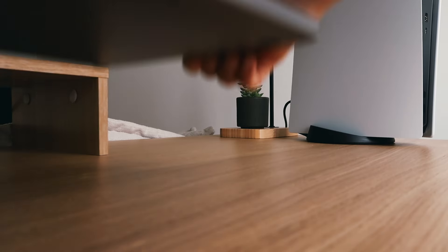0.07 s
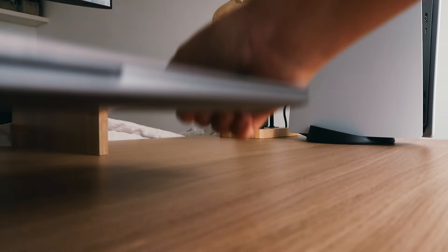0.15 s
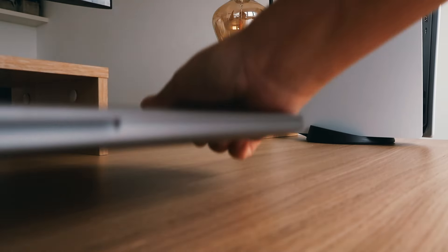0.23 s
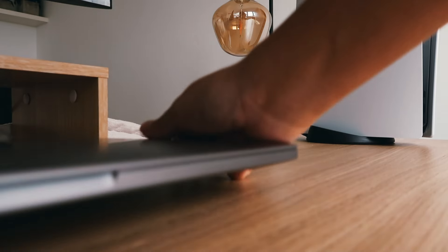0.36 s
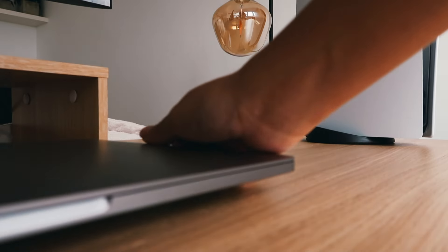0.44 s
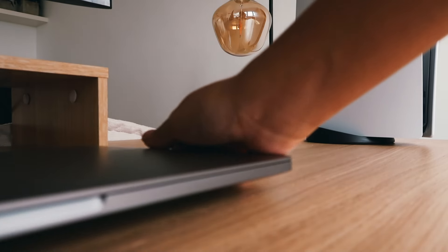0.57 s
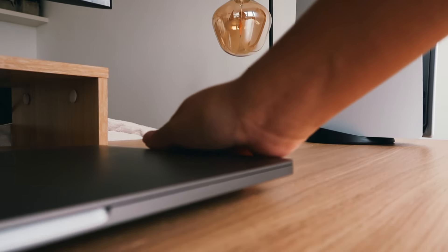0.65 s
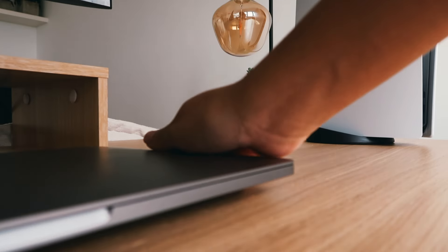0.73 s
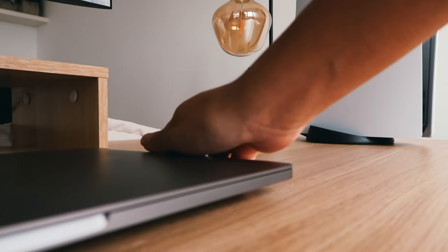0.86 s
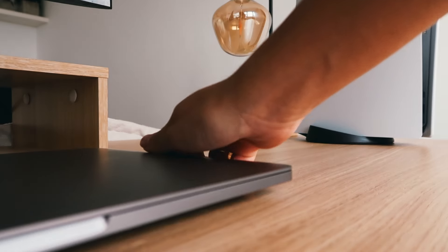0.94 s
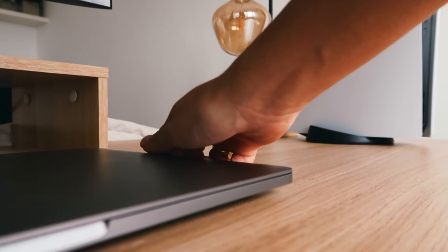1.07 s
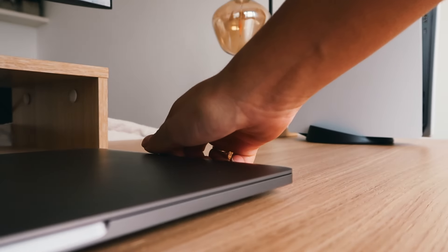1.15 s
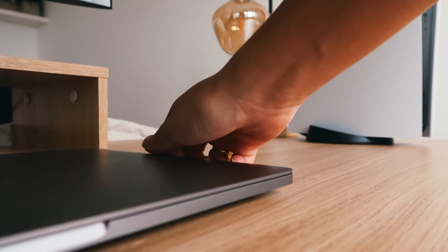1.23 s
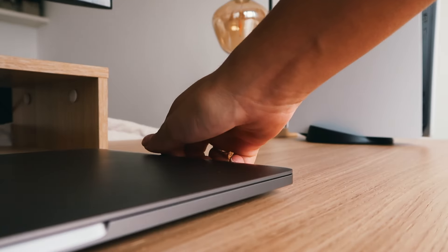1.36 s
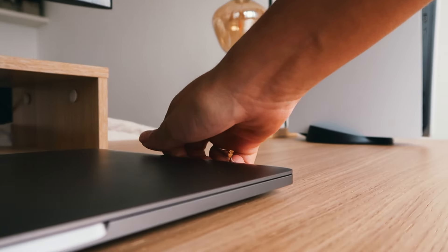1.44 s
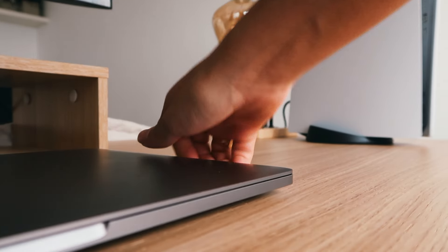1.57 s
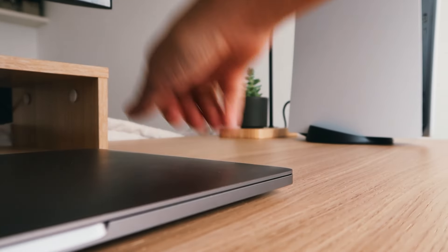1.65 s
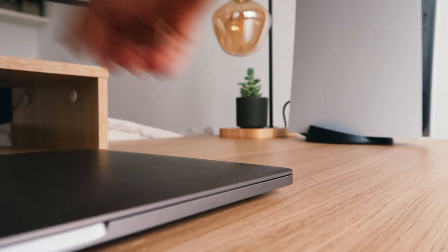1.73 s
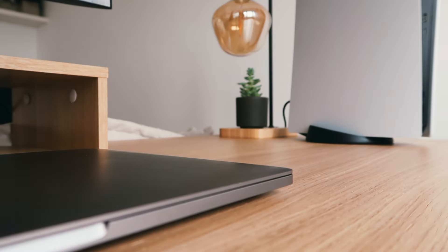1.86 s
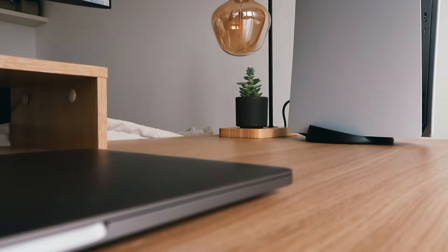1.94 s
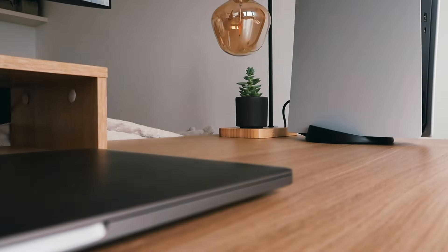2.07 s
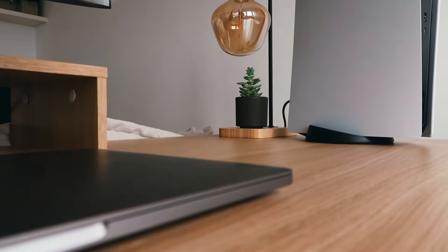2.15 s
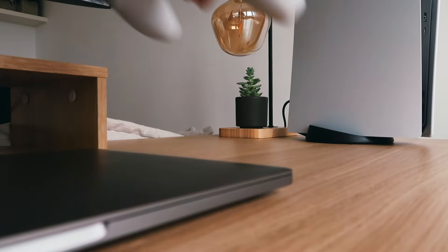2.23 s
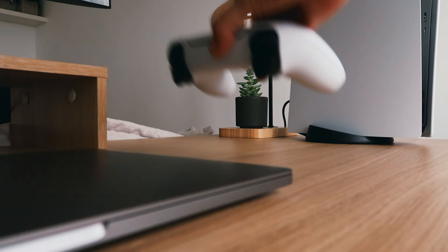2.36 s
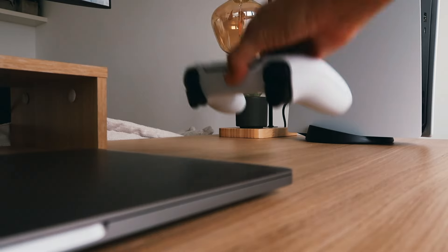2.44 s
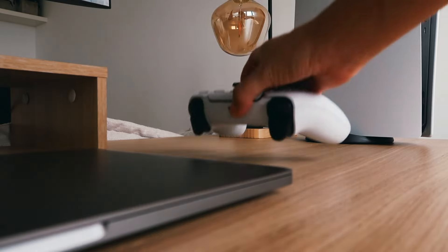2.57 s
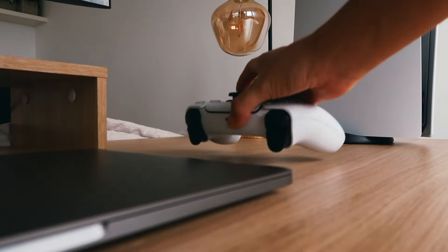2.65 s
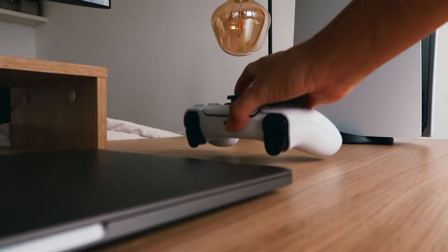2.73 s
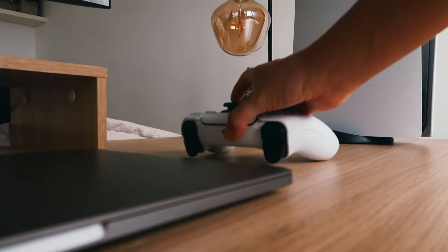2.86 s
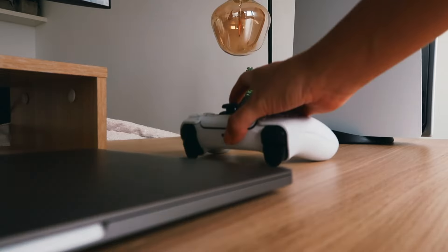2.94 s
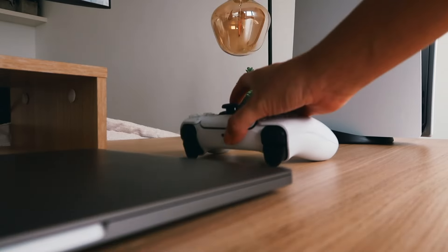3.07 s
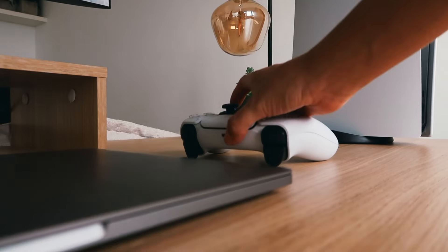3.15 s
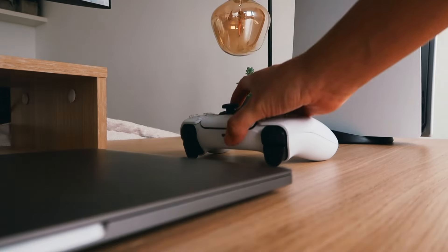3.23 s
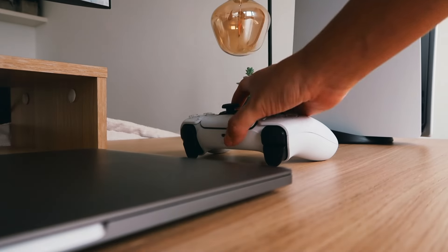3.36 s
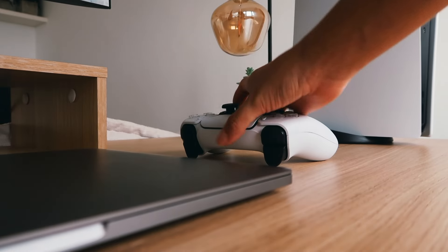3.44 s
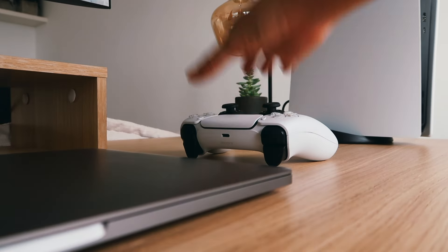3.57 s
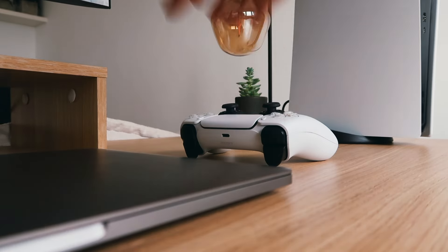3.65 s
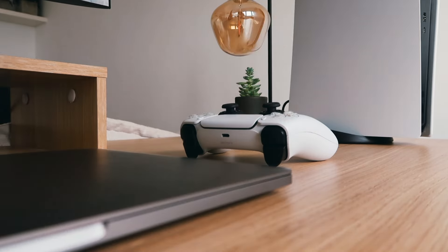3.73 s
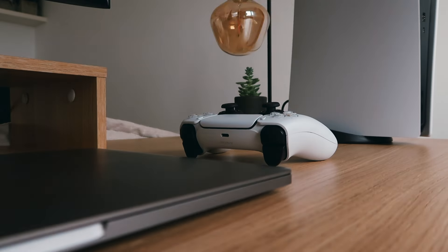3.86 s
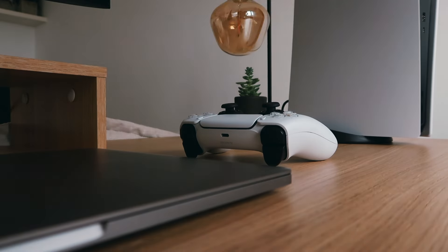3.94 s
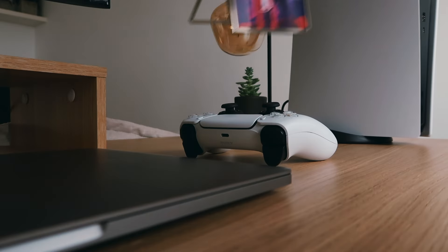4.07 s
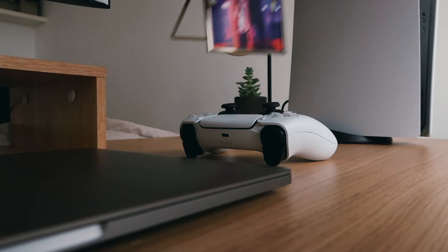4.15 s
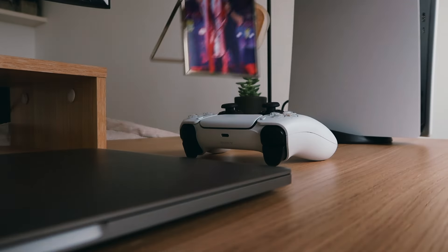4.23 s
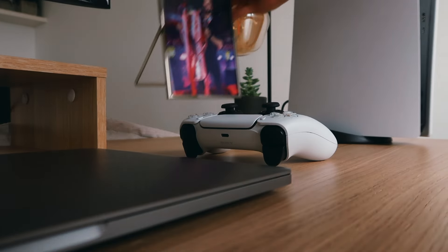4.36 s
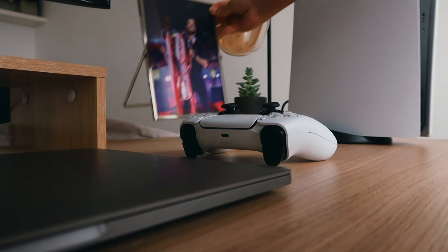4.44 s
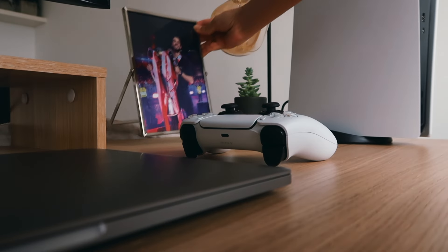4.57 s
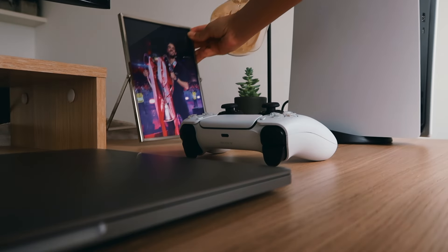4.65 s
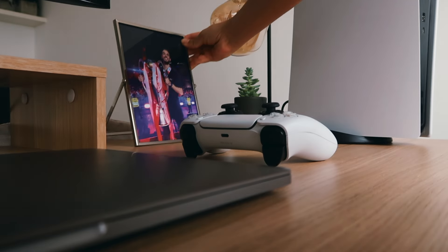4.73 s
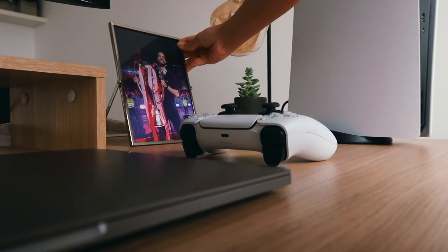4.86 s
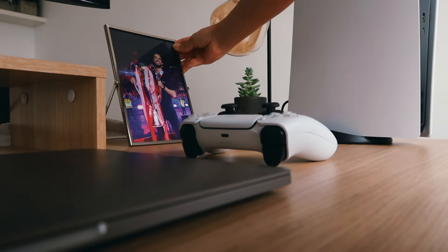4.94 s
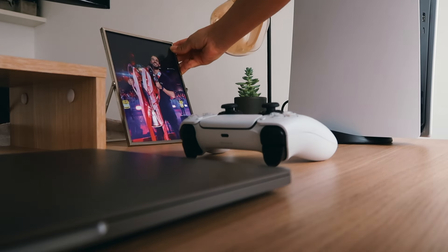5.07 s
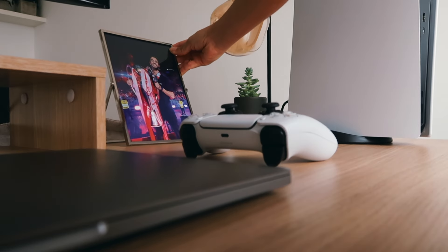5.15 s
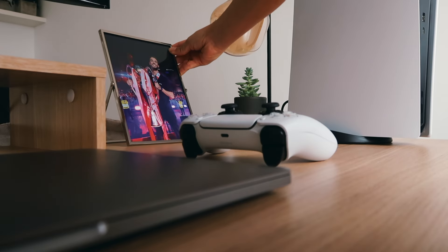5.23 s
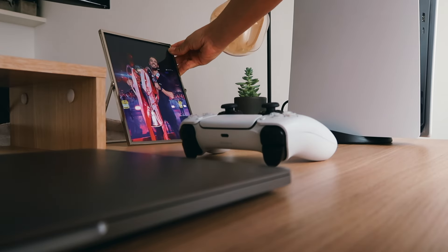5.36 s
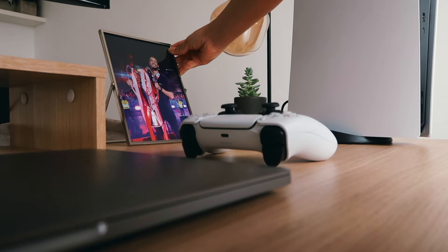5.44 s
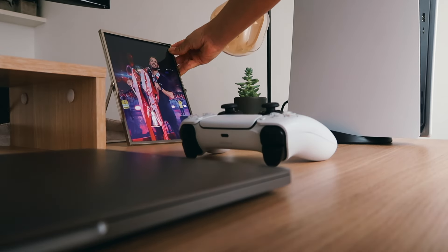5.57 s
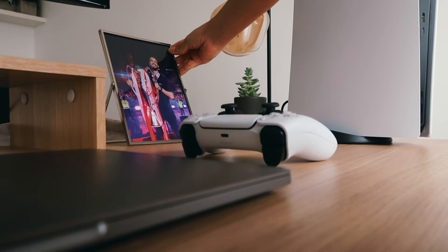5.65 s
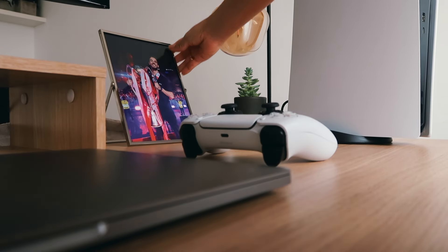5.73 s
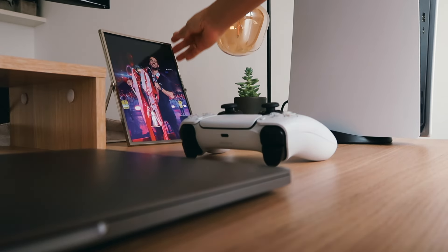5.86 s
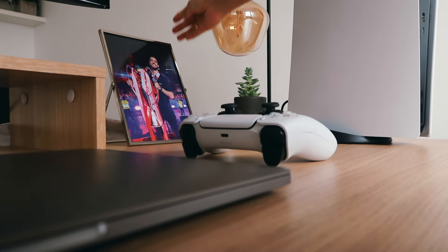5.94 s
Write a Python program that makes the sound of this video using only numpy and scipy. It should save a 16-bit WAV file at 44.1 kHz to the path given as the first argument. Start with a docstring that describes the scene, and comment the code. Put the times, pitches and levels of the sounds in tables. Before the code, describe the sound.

A laptop, a game controller and a standing picture frame are set down in turn on a wooden desk, knocking sharply in a quiet room.

```python
"""Fingers brush softly over a quiet room tone, then a laptop clunks down on a wooden desk in a small room.
A game controller follows with rattle and small ticks, then a standing picture frame that slides on its stand.
Each lands on one edge and then on its other feet; every contact sends out a pulse and rings object and desk.
Damped modes make the knocks, trains of tiny slips the rubs, shaped noise the air and a sine the whine."""
import sys
import numpy as np
from scipy import signal
from scipy.fft import rfft, irfft
from scipy.io import wavfile

SR = 44100
rng = np.random.default_rng(int(sys.argv[2]) if len(sys.argv) > 2 else 0)


def put_to_file(sound):
    """Save the sound as 16-bit audio at rate SR, in the file named by the first command-line argument."""
    columns = np.atleast_2d(sound).T  # one column per channel
    safe = np.clip(columns, -1, 1)
    whole_steps = np.round(safe * 32767)
    wavfile.write(sys.argv[1], SR, whole_steps.astype(np.int16))


N = 264600   # length in samples (6 s)
AGE = np.arange(SR) / SR   # seconds since a sound began
EDGES = 20 * 2 ** np.arange(0, 10.1, .5)   # half-octave band edges, Hz
CENTRES = np.sqrt(EDGES[1:] * EDGES[:-1])
BANK = [signal.butter(2, band, "band", fs=SR, output="sos") for band in zip(EDGES, EDGES[1:])]

# Laptop contacts: start_s, level_db, place (0 landing edge to 1 far feet), free_db (how freely it rings),
# desk_db (desk-top ring), sway_db (whole desk), wet_db (sent to the room), top_hz (contact bandwidth)
LAPTOP_CONTACTS = [(.449, -31, 0.3, -4, 1.5, -13, -3, 308), (.6436, 1, 0.29, 0.5, -2.5, 2, -5.5, 5500),
                   (.7396, -11, 0.92, 4.5, 3, 12, 0.5, 3100), (1.0724, -5, 0.89, -6, -4.5, 8, -10, 1710),
                   (1.578, -26.5, 0.77, 0, -6, -4, -3, 380)]
# Laptop modes: pitch_hz, edge_db (struck on landing edge), feet_db (struck on far feet), t60_s
LAPTOP_MODES = [(197, -28.5, -24, 0.13), (297, -56, -37, 0.096), (380, -29, -27, 0.05),
                (467.7, -26.5, -34, 0.15), (637, -29, -34.5, 0.1), (767, -35, -39, 0.058),
                (930, -52, -44, 0.014), (1114, -24, -42, 0.023), (1285, -31, -29, 0.032),
                (1463, -39, -37, 0.076), (1580, -35, -33, 0.015), (1835, -33.5, -31.5, 0.037),
                (2770, -46, -45, 0.063), (3130, -32, -35, 0.021), (4300, -40, -41, 0.017),
                (5990, -32, -46, 0.018)]
# Laptop's crowd of quickly damped higher modes: pitch_hz, density_db (per Hz)
LAPTOP_CROWD = [(30, -20), (80, -5), (230, 18.5), (600, 6), (1000, 1), (1650, 1), (2200, -10.5),
                (5000, -19.5), (8000, -24.5), (14000, -8.5)]
# Hard laptop edge clicking on the desk: start_s, level_db
LAPTOP_CLICKS = [(.582, -22.5), (1.0724, -18.5), (1.557, -27)]


def laptop():
    """A broad plate lands with a short crack, a chassis ring and a strong answer from the desk."""
    landing = set_down(LAPTOP_CONTACTS, LAPTOP_MODES, LAPTOP_CROWD, modes_db=-1.5, pulse_db=-1.0,
                       crack_db=0.0, crack_t60=0.018, lag_s=0.00041, room_db=-3.5, boom_db=-10.5,
                       diffuse_db=2.5, order=3, lowest_hz=22)
    clicks = edge_clicks(LAPTOP_CLICKS, LAPTOP_MODES, LAPTOP_CROWD, modes_db=-10, low_hz=249,
                         high_hz=4000, crack_t60=0.012, room_db=-8.0)
    return landing + clicks


# Controller contacts: start_s, level_db, place (0 landing edge to 1 far feet), free_db (how freely it rings),
# desk_db (desk-top ring), sway_db (whole desk), wet_db (sent to the room), top_hz (contact bandwidth)
CONTROLLER_CONTACTS = [(2.8707, -1.5, 0.019, 1, -5.5, -24, -4, 5840),
                       (2.8757, -5, 0.19, -8, -16, -26, -9, 4500), (2.8975, -20, 0, 8, -14, -26, -9, 2600),
                       (2.918, -5, 0.99, 0, -1.5, -26, -5, 4300),
                       (2.9282, -10.5, 1, -0.5, 2, -27, -2, 1900),
                       (2.9455, -14.5, 0.45, -2, -2.5, -27, 5.5, 2100),
                       (2.9915, -13.5, 0.93, 2.5, 5, -15, 1.5, 1400),
                       (3.4868, -21.5, 0.6, -3, 4, -1, -1, 845)]
# Controller modes: pitch_hz, edge_db (struck on landing edge), feet_db (struck on far feet), t60_s
CONTROLLER_MODES = [(97, -29.5, -32.5, 0.18), (166, -37, -32, 0.22), (229, -26.5, -38, 0.13),
                    (394, -50, -25, 0.14), (539, -28.5, -45, 0.22), (630, -21.5, -40, 0.06),
                    (722, -25.5, -33, 0.053), (890, -31.5, -22.5, 0.034), (1414, -44, -52, 0.22),
                    (1565, -34.5, -24.5, 0.03), (1700, -44, -52, 0.043), (2540, -60, -41, 0.03),
                    (2880, -58, -60, 0.043), (3800, -46, -41, 0.028)]
# Controller's crowd of quickly damped higher modes: pitch_hz, density_db (per Hz)
CONTROLLER_CROWD = [(25, -36), (60, -6), (115, 16), (380, 12), (650, 10.5), (1000, -2), (1700, 1.5),
                    (2600, -7.5), (4000, -21), (8000, -29), (14000, -21)]
# Hard controller edge clicking on the desk: start_s, level_db
CONTROLLER_CLICKS = [(2.9178, -8), (2.9883, 0)]


def controller():
    """A plastic shell lands with a longer crack, hard edge clicks and loose parts that chatter."""
    landing = set_down(CONTROLLER_CONTACTS, CONTROLLER_MODES, CONTROLLER_CROWD, modes_db=-3.5, pulse_db=0.0,
                       crack_db=-2, crack_t60=0.03, lag_s=0.00079, room_db=-4.0, boom_db=-6.5,
                       diffuse_db=-2.5, order=2, lowest_hz=83)
    clicks = edge_clicks(CONTROLLER_CLICKS, CONTROLLER_MODES, CONTROLLER_CROWD, modes_db=-17, low_hz=1780,
                         high_hz=4270, crack_t60=0.02, room_db=-7.0)
    return landing + clicks + rattle(CONTROLLER_CONTACTS, CONTROLLER_CROWD, CONTROLLER_MODES)


def rattle(contacts, crowd, modes, clicks_per_s=710, t60_s=0.24, level_db=-13.5, shell_db=5.5, room_db=-7.5):
    """Each blow shakes loose buttons and triggers into a dying run of tiny clicks on the shell."""
    growth = 2.14   # dB of rattle per dB of blow: gentle touches barely shake the parts
    out, room = np.zeros((2, N)), room_response(0)
    shell = from_db(shell_db) * ring(struck_at(modes, 0))
    click = low_pass(high_pass(first_wave(crowd) + shell, 880), 3100, order=3)
    for start_s, blow_db, *_ in contacts:
        touches = (rng.random(SR) < clicks_per_s / SR) * rng.choice([-1, 1], SR)
        touches = touches * from_db(-60 * AGE / t60_s)
        sound = from_db(growth * blow_db + level_db) * signal.fftconvolve(touches, click)[:SR]
        add(out, start_s, at_ports(sound) + from_db(room_db) * echo(sound, room))
    return out


# Plastic ticks: start_s, level_db, button_db (share that rings the button), cut_hz
TICK_TIMES = [(3.4756, -18.5, 4, 4500), (3.4784, -16.5, 0, 3980), (3.8922, -26, -17, 13000)]
# Tick colour: pitch_hz, density_db (per Hz)
TICK_CROWD = [(100, 4), (1000, -12), (1750, -5), (2500, -23), (4000, -11), (8000, -36), (14000, -23)]
# A released button rings: pitch_hz, level_db, t60_s
BUTTON_MODES = [(1730, -40.5, 0.028), (3700, -41, 0.012)]


def ticks(room_db=-10.0):
    """Tiny clicks of plastic as the hand lets go and the controller rests: a short crack and a button ring."""
    out, room = np.zeros((2, N)), room_response(0)
    for start_s, level_db, button_db, cut_hz in TICK_TIMES:
        button = from_db(button_db) * ring(BUTTON_MODES)
        click = from_db(level_db) * low_pass(crack(TICK_CROWD, t60=0.013) + button, cut_hz)
        add(out, start_s, at_ports(click) + from_db(room_db) * echo(click, room))
    return out


# Frame contacts: start_s, level_db, place (0 landing edge to 1 far feet), free_db (how freely it rings),
# desk_db (desk-top ring), sway_db (whole desk), wet_db (sent to the room), top_hz (contact bandwidth)
FRAME_CONTACTS = [(4.7524, 1, 0.19, 0.0035, 1.5, -19, -3, 6860), (4.8417, 0.5, 1, 0, -5.5, -27, -2, 4700),
                  (5.1585, -4.5, 1, 0, -4, -23, -2, 2920), (5.249, -29, 0.67, 0, 10, -12, 2.5, 550),
                  (5.336, -20.5, 1, 0, -1, -18, -9.5, 690)]
# Frame modes: pitch_hz, edge_db (struck on landing edge), feet_db (struck on far feet), t60_s
FRAME_MODES = [(274, -11.5, -27, 0.03), (295, -29.5, -24, 0.14), (396.4, -20.5, -23, 0.092),
               (447, -20, -16.5, 0.056), (610, -42, -44, 0.069), (900, -47, -56, 0.065),
               (1200, -61, -31, 0.048), (1340, -22.5, -28.5, 0.056), (1520, -29, -27, 0.045),
               (1744, -36, -49, 0.054), (2194, -28.5, -35, 0.031), (2560, -26, -23.5, 0.018),
               (3110, -37, -38.5, 0.018), (3950, -41.5, -50, 0.022), (4350, -63, -41, 0.017),
               (5700, -42, -56, 0.029)]
# Frame's crowd of quickly damped higher modes: pitch_hz, density_db (per Hz)
FRAME_CROWD = [(30, -11), (70, 5.5), (300, 15), (700, -0.5), (1000, -4.5), (1500, -1.5), (2500, -8.5),
               (4000, -28), (8000, -36), (14000, -32)]
# Hard frame edge clicking on the desk: start_s, level_db
FRAME_CLICKS = [(5.1565, -7.5)]


def frame():
    """A frame lands with a soft pulse, a knock spread by bending waves and a full room answer."""
    landing = set_down(FRAME_CONTACTS, FRAME_MODES, FRAME_CROWD, modes_db=-7.5, pulse_db=-12.5,
                       crack_db=-1.0, crack_t60=0.024, lag_s=0.001595, room_db=-6.5, boom_db=-1.5,
                       diffuse_db=6.0, order=2, lowest_hz=35.6)
    clicks = edge_clicks(FRAME_CLICKS, FRAME_MODES, FRAME_CROWD, modes_db=-7, low_hz=2200,
                         high_hz=7440, crack_t60=0.01, room_db=-9.0)
    return landing + clicks


# Desk-top modes: pitch_hz, level_db, t60_s
DESK_MODES = [(122, -41.5, 0.59), (179.1, -35, 0.54), (197.3, -26, 0.089), (230, -55, 0.11),
              (280.3, -38, 0.11), (322, -34.5, 0.13)]
# Modes of the whole desk on its legs: pitch_hz, level_db, t60_s
SWAY_MODES = [(52, -50.5, 0.68), (68, -36.5, 0.3), (90.4, -45, 0.35), (110, -40.5, 0.34)]


def set_down(contacts, modes, crowd, modes_db, pulse_db, crack_db, crack_t60, lag_s, room_db, boom_db,
             diffuse_db, order, lowest_hz):
    """Every contact sends out a pulse and rings object and desk; where it touches decides which modes speak."""
    out, room = np.zeros((2, N)), room_response(0)
    pulse = from_db(pulse_db) * first_wave(crowd)
    for start_s, level_db, place, free_db, desk_db, sway_db, wet_db, top_hz in contacts:
        object_ring = from_db(modes_db + free_db) * ring(struck_at(modes, place))
        desk_ring = from_db(desk_db) * low_pass(ring(DESK_MODES, in_step=True), 870)
        # air slips round a small plate, so it radiates little bass
        body = high_pass(object_ring + desk_ring, 76)
        attack = high_pass(pulse + from_db(crack_db + free_db) * crack(crowd, crack_t60), lowest_hz)
        # the whole desk nods on its legs
        sway = from_db(sway_db) * high_pass(ring(SWAY_MODES), 35)
        direct = at_ports(dispersed(attack + body + sway, lag_s))
        # low modes keep their pitch in the room; high ones beam in all directions and blend to a smooth wash
        boom = from_db(boom_db) * echo(low_pass(body, 810), room)
        tail = boom + from_db(diffuse_db) * wash(crowd)
        # each contact has its own bandwidth: dull thuds lose more treble than bright knocks
        knock = low_pass(direct + from_db(room_db + wet_db) * tail, top_hz, order=order)
        add(out, start_s, from_db(level_db) * knock)
    return out


def edge_clicks(clicks, modes, crowd, modes_db, low_hz, high_hz, crack_t60, room_db):
    """An edge touches with no weight behind it: a crack and the high modes, without the bass."""
    out = np.zeros((2, N))
    for start_s, level_db in clicks:
        attack = from_db(-6.5) * first_wave(crowd) + crack(crowd, crack_t60)
        direct = at_ports(attack + from_db(modes_db) * ring(struck_at(modes, 1)))
        click = high_pass(direct + from_db(room_db) * wash(crowd), low_hz)
        add(out, start_s, from_db(level_db) * low_pass(click, high_hz))
    return out


# Frame slides: peak_s, swell_s, fade_s, level_db, cut_hz
SLIDE_STROKES = [(5.151, 0.026, 0.012, -45.5, 4300), (5.21, 0.082, 0.035, -49, 2200),
                 (5.348, 0.033, 0.019, -54, 820), (5.535, 0.019, 0.0089, -55.5, 1000)]
# Colour of one scraping slip: pitch_hz, level_db
SCRAPE_COLOUR = [(100, 4), (400, 12), (700, 3), (1400, 0), (2600, -7), (3400, -13), (4200, -13),
                 (6000, -24), (14000, -36)]


def frame_slides():
    """The frame slides a little on its stand: each slip gives a scrape and a dull ring of the frame."""
    frame_ring = from_db(-9.0) * low_pass(ring(struck_at(FRAME_MODES, 0.55)), 440)
    texture = frame_ring + first_wave(SCRAPE_COLOUR)
    return rub(SLIDE_STROKES, texture, slips_per_s=2200, grain_db=1.5, room_db=-8.5)


# Finger rubs: peak_s, swell_s, fade_s, level_db, cut_hz
FINGER_STROKES = [(.19, 0.014, 0.017, -64, 1780), (.25, 0.026, 0.034, -68, 1900),
                  (1.583, 0.032, 0.023, -59, 1800), (1.599, 0.011, 0.0074, -59.5, 14000),
                  (1.62, 0.006, 0.014, -63, 16000), (1.653, 0.0065, 0.0072, -71, 9100),
                  (2.025, 0.037, 0.02, -62, 680)]
# Colour of one slip of skin: pitch_hz, level_db
SKIN_COLOUR = [(100, -16), (400, 10), (900, 5.5), (1600, 11), (3000, 10.5), (5500, 3.5), (9000, -15),
               (13000, -7), (16000, -18)]


def finger_brushes():
    """Fingers brush off the lid: soft, unevenly grained trains of skin slips."""
    return rub(FINGER_STROKES, first_wave(SKIN_COLOUR), slips_per_s=1600, grain_db=4.0, room_db=-7.5)


def rub(strokes, texture, slips_per_s, grain_db, room_db):
    """Separate tiny slips of uneven strength, under a swelling stroke, drive the surface that is rubbed."""
    out, room = np.zeros((2, N)), room_response(0)
    lead_s = .125   # room for the swell before the peak
    for peak_s, swell_s, fade_s, level_db, cut_hz in strokes:
        unevenness = rms_one(low_pass(rng.standard_normal(SR), 100))
        sizes = rng.choice([-1, 1], SR) * from_db(grain_db * unevenness)
        slips = (rng.random(SR) < slips_per_s / SR) * sizes
        friction = rms_one(low_pass(signal.fftconvolve(slips, texture)[:SR], cut_hz))
        stroke = np.exp(-((AGE - lead_s) / np.where(AGE < lead_s, swell_s, fade_s)) ** 2)
        sound = from_db(level_db) * friction * stroke
        add(out, peak_s - lead_s, at_ports(sound) + from_db(room_db) * echo(sound, room))
    return out


# Air noise colour, mid: pitch_hz, level_db
AIR_MID = [(12, -43), (20, -22), (49, -0.5), (97, -2), (151, -10.5), (174, -3), (205, -9), (302, -5.5),
           (357, -4), (409, -15), (674, -16), (733, -17), (940, -16.5), (12700, -39.5), (15000, -121)]
# Air noise colour, side: pitch_hz, level_db
AIR_SIDE = [(12, -61), (20, -36), (155, 4.5), (398, 5), (525, -1.5), (1020, -4.5), (2220, -11), (4200, -11),
            (4950, -22), (12700, -27), (15000, -71)]


def room_tone(mid_db=-63, side_db=-65, whine_hz=13007, whine_db=-95):
    """Dull steady air noise and a thin electrical whine, a pure sine."""
    whine = from_db(whine_db) * np.sqrt(2) * np.sin(2 * np.pi * whine_hz * np.arange(N) / SR)
    air = np.array([from_db(mid_db) * steady(AIR_MID, N), from_db(side_db) * steady(AIR_SIDE, N)])
    return low_pass(air, 12000, order=10) + np.array([whine, 0.3 * whine])


# Room decay: pitch_hz, t60_s
ROOM_DECAY = [(60, 0.4), (160, 0.51), (420, 0.45), (1100, 0.39), (2900, 0.64), (8000, 0.47), (14000, .2)]
# Room colour: pitch_hz, level_db
ROOM_BALANCE = [(60, 10.5), (160, 5), (400, 6), (900, 1), (2500, 2), (6000, 8), (14000, -4.5)]
# Two close microphone ports hear the bass alike: pitch_hz, side_minus_mid_db
PORT_WIDTH = [(60, -62), (170, -51), (350, -18), (700, -19), (1400, -14.5), (2800, -8), (5500, -4),
              (11000, 6.5)]


def room_response(spectrum, build_s=0.0025, lumpy_db=4.5, mixing_s=0.076):
    """Mid and side reverberation of a short burst: separate wall echoes thicken, then die band by band."""
    age = AGE[:SR * 3 // 4]
    unevenness = rms_one(low_pass(rng.standard_normal(len(age)), 400))
    lumps = from_db(lumpy_db * np.exp(-age / mixing_s) * unevenness)
    build = 1 - np.exp(-(age / build_s) ** 2)
    dying = [lumps * build * from_db(-60 * age / t60) for t60 in at_hz(ROOM_DECAY, CENTRES)]
    colour = at_hz(ROOM_BALANCE, CENTRES) + spectrum
    return np.array([banded(colour, dying), banded(colour + at_hz(PORT_WIDTH, CENTRES), dying)])


def at_ports(sound, scatter_s=0.00038):
    """Mid and side of the direct sound: scatter from things close by makes the two ports differ."""
    dying = np.exp(-AGE[:SR // 20] / scatter_s)
    scatter = banded(at_hz(PORT_WIDTH, CENTRES), [dying] * len(BANK))
    return np.array([sound, signal.fftconvolve(sound, scatter)[:SR]])


def echo(sound, room):
    """A sound as the walls return it."""
    return signal.fftconvolve(sound[None], room, axes=1)[:, :SR]


def wash(crowd):
    """The room's smooth answer to a crack."""
    response = room_response(at_hz(crowd, CENTRES))
    return np.pad(response, ((0, 0), (0, SR - response.shape[1])))


def struck_at(modes, place):
    """The modes as a contact excites them, between the landing edge (0) and the far feet (1)."""
    hz, edge_db, feet_db, t60 = np.array(modes).T
    return np.transpose([hz, edge_db + np.clip(place, 0, 1) * (feet_db - edge_db), t60])


def ring(modes, spread_db=2.0, in_step=False):
    """Struck modes, varying a little in strength; those of the board under the contact all start in step."""
    hz, db, t60 = np.array(modes).T[:, :, None]
    signs = 1 if in_step else (-1) ** np.arange(len(hz))[:, None]
    strength_db = db + rng.normal(0, spread_db, db.shape)
    decay = from_db(strength_db - 60 * AGE / t60)
    return np.sum(signs * decay * np.sin(2 * np.pi * hz * AGE), axis=0)


def crack(crowd, t60):
    """Dense damped modes of shell and board; the low ones last longer (t60 holds at 1 kHz)."""
    age = AGE[:SR // 5]
    dying = [from_db(-60 * age / (t60 * (1000 / hz) ** 0.09)) for hz in CENTRES]
    return np.pad(banded(at_hz(crowd, CENTRES), dying), (0, SR - len(age)))


def first_wave(spectrum):
    """The single sharp pressure pulse that leaves the point of contact, as a minimum-phase pulse."""
    gain = from_db(at_hz(spectrum, np.arange(SR // 2 + 1) + 1))
    cepstrum = irfft(np.log(gain), SR)
    # folding the cepstrum gathers the energy at the start
    cepstrum[1:SR // 2] *= 2
    cepstrum[SR // 2 + 1:] = 0
    return irfft(np.exp(rfft(cepstrum)), SR)


def dispersed(sound, lag_s, corner_hz=1300):
    """Bending waves in a board: the treble runs ahead and the bass arrives lag_s later; the end fades out."""
    hz = np.arange(SR // 2 + 1)
    phase = 2 * np.pi * lag_s * corner_hz * np.arctan(hz / corner_hz)
    spread = irfft(rfft(sound) * np.exp(-1j * phase), SR)
    return spread * np.minimum(1, 2 * (1 - AGE)) ** 2


def banded(levels_db, envelopes):
    """Half-octave bands of noise, each under its envelope, with the given energy per Hz."""
    out = 0
    for sos, width, db, envelope in zip(BANK, np.diff(EDGES), levels_db, envelopes):
        size = len(envelope)
        band = signal.sosfilt(sos, rng.standard_normal(size) * envelope + 1e-18)
        out = out + from_db(db) * rms_one(band) * np.sqrt(2 * width / SR / size)
    return out


def steady(spectrum, size):
    """Even noise of a given colour, rms 1."""
    return rms_one(banded(at_hz(spectrum, CENTRES), [np.ones(size)] * len(BANK)))


def from_db(db):
    """Decibels to gain."""
    return 10 ** (np.asarray(db) / 20)


def at_hz(points, hz):
    """Read a table on a log-frequency axis."""
    table = np.array(points)
    return np.interp(np.log(hz), np.log(table[:, 0]), table[:, 1])


def rms_one(x):
    """Scale to rms 1."""
    return x / np.sqrt(np.mean(x ** 2) + 1e-30)


def low_pass(x, hz, order=2):
    """Causal Butterworth low-pass."""
    sos = signal.butter(order, min(hz, SR / 2 - 1000), fs=SR, output="sos")
    return signal.sosfilt(sos, x + 1e-18)


def high_pass(x, hz):
    """Causal Butterworth high-pass."""
    return signal.sosfilt(signal.butter(2, hz, "high", fs=SR, output="sos"), x + 1e-18)


def add(out, start_s, sound):
    """Mix a sound in at its start time."""
    start = max(round(start_s * SR), 0)
    out[:, start:start + sound.shape[-1]] += sound[..., :N - start]


def scene():
    """Three objects in turn, with their rubs and ticks, over the room tone; mid and side become left and right."""
    objects = laptop() + controller() + frame()
    touches = ticks() + frame_slides() + finger_brushes()
    mid, side = objects + touches + room_tone()
    return np.array([mid + side, mid - side])


def record(dry):
    """The deepest rumble and the top are cut."""
    top_cut = signal.ellip(10, .1, 80, 15200, fs=SR, output="sos")
    return signal.sosfilt(top_cut, high_pass(dry, 24))


dry = scene()
out = record(dry)
put_to_file(out)
```